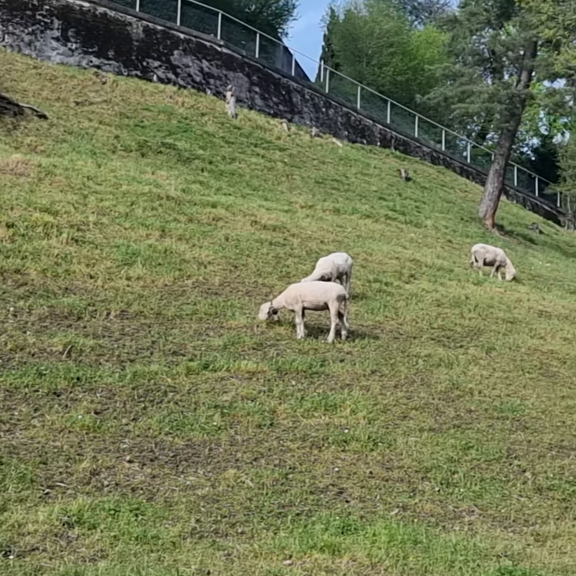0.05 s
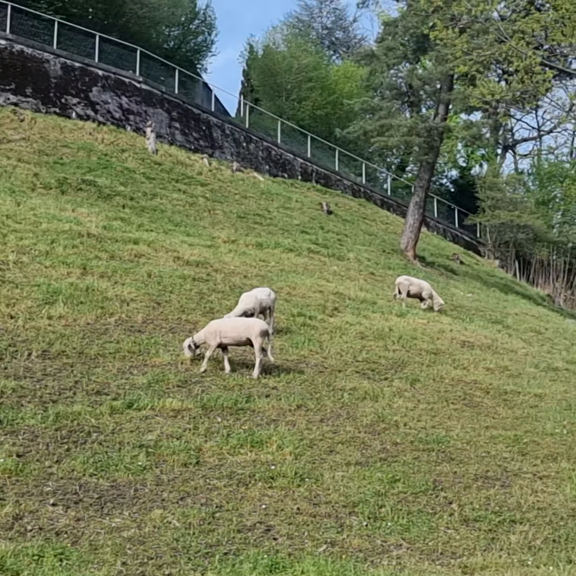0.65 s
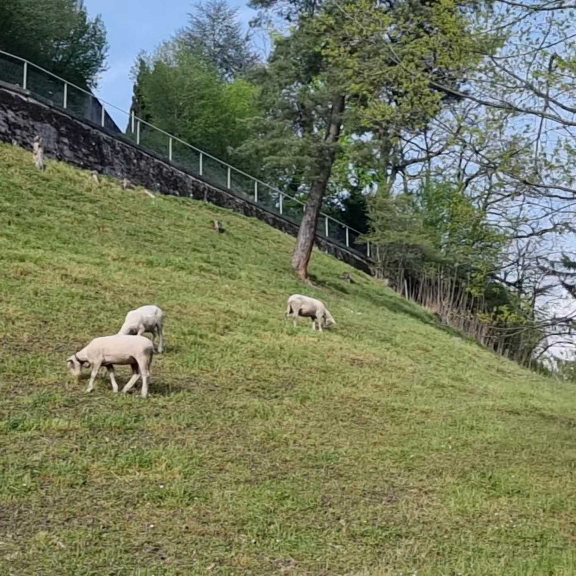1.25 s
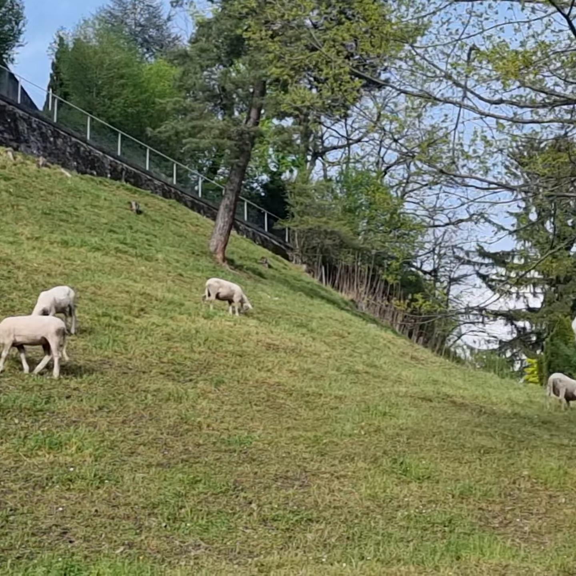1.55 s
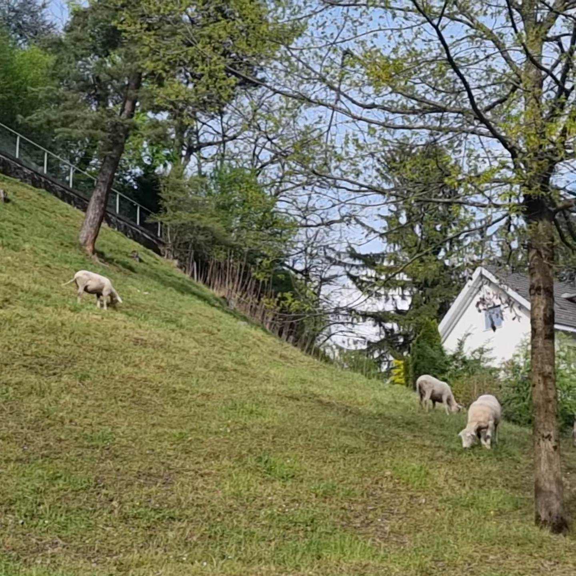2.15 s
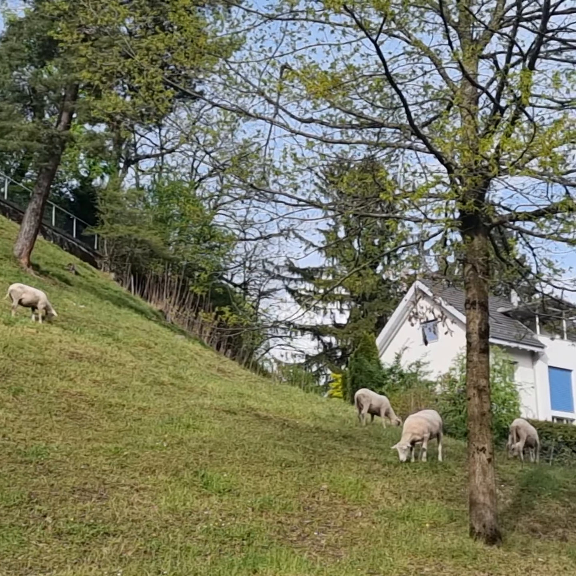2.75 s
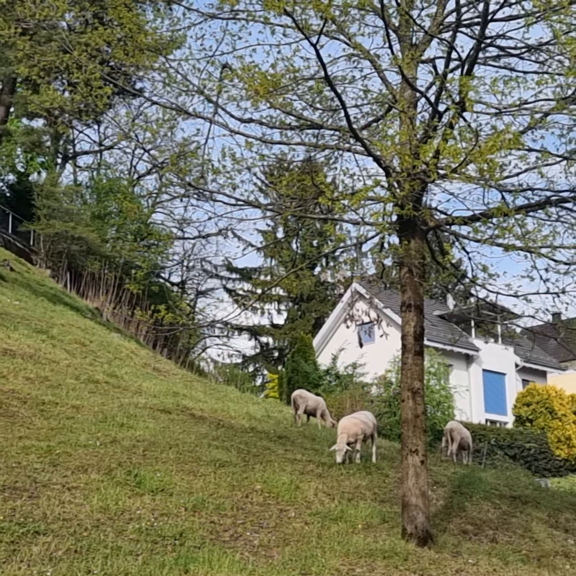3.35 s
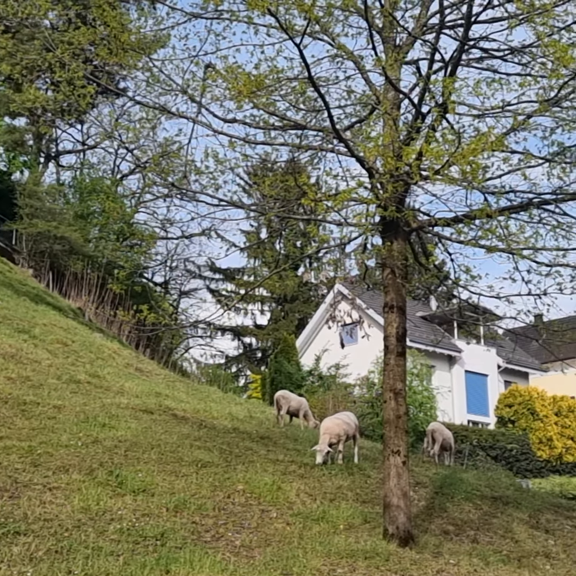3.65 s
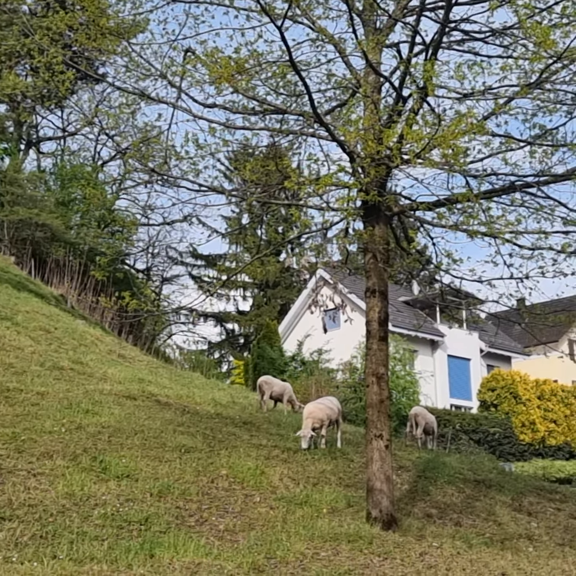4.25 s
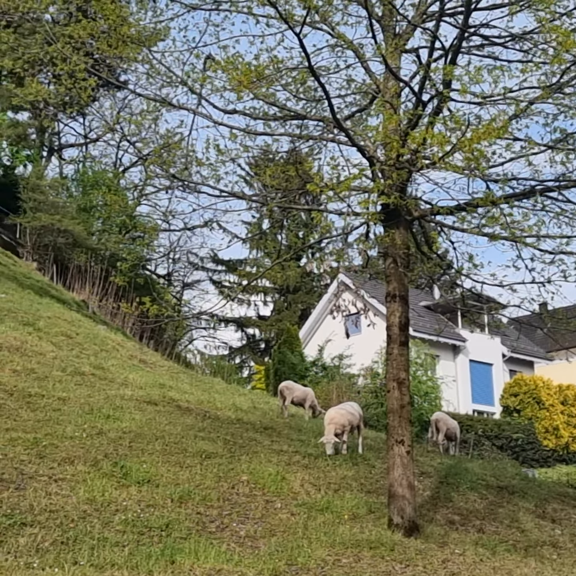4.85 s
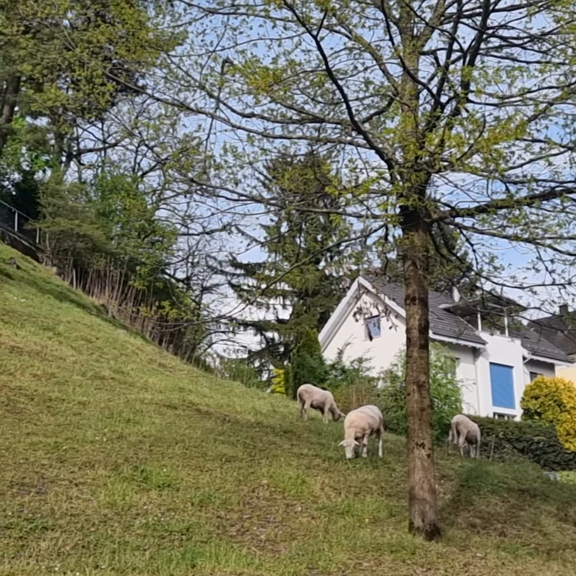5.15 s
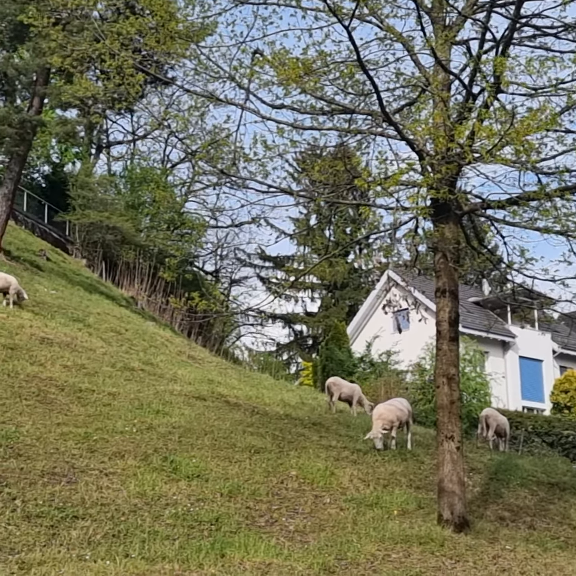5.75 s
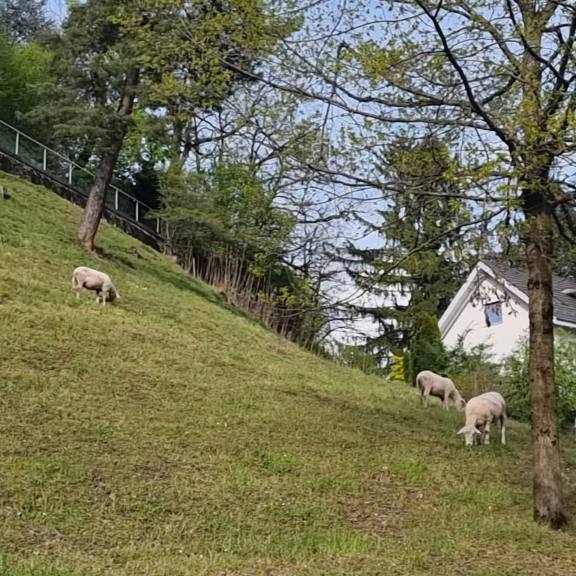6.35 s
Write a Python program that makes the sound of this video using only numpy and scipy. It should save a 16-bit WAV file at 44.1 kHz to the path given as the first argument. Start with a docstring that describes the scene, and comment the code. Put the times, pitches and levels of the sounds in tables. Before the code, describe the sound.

Wind buffets the microphone with low thumps while a small metal bell on a sheep knocks irregularly nearby, each hit bright and briefly ringing. The wind eases midway, leaving the bell and a bird's faint gliding whistles from the trees, then gusts come back near the end. An engine hums very quietly far away. The sound has a slight outdoor echo and sits in the left channel only.

```python
"""Sheep bell on a windy hillside

Close by on a grassy slope, the clapper of a small collar bell knocks and bounces as a sheep tugs at
the grass. A bird whistles slow glides from the trees, an engine hums far off, and gusts buffet the
microphone. Hillside, wall and houses return a faint echo. The scene is on the left channel alone."""
import sys
import numpy as np
from scipy import signal
from scipy.fft import rfft, irfft, next_fast_len
from scipy.io import wavfile
from scipy.ndimage import uniform_filter1d

SR = 44100
rng = np.random.default_rng(int(sys.argv[2]) if len(sys.argv) > 2 else 0)


def int16_out(signal):
    """Quantize to a 16-bit WAV file."""
    q = np.round(np.clip(np.atleast_2d(signal).T, -1, 1) * 32767)
    wavfile.write(sys.argv[1], SR, q.astype(np.int16))


N = 286209
TIME = np.arange(N) / SR


def bell(ring_db=-1):
    """A small collar bell, close by: its loose clapper sets the wall ringing and clashes against it."""
    hits = clapper_contacts()
    return undb(ring_db) * bell_ring(hits) + bell_clash(hits)


def clapper_blows(node_depth=0.96):
    """A blow drives modes fully at an antinode, barely at a node; rows of start_s, level_db per family."""
    # clapper blows on the rim: start_s, strength_db, brightness_db, place_deg
    blows = [(0.3409, -28.5, -6.0, 88.4), (0.668, -30, -1.5, 152), (0.97, -43.0, 1.5, 172),
             (0.9954, -34, -10.5, 172), (1.1873, -39.5, 5, 50.3), (1.2059, -32, -0.5, 26.4),
             (1.324, -26, -0.5, 174), (1.5045, -27.5, -0.5, 82), (1.523, -22.5, -1, 86),
             (1.592, -43, 2.5, 84), (1.7038, -42, -3, 140), (1.8442, -37.5, -0.5, 66),
             (1.925, -35.5, -14.0, 173), (2.204, -45.5, -11, 164), (2.2996, -31, -13.5, 88),
             (2.35, -36, -4, 168), (2.587, -41.5, 1.5, 126), (2.609, -33.5, -1, 56.5),
             (2.7446, -36, -8.0, 28), (2.867, -34, -5, 165), (2.8859, -30.5, -1.5, 1.2),
             (3.212, -42.0, 6, 15.4), (3.228, -48.5, 8.0, 60), (3.243, -45, -5, 172),
             (3.4208, -33.5, -2, 148), (3.5092, -33, 5, 15), (3.7164, -41, -14.5, 7.8),
             (3.8036, -39, 1, 106), (4.045, -48.5, 4, 31.6), (4.0907, -45.5, -7.5, 130),
             (4.321, -45.5, -14.5, 144), (4.3883, -36, -2.0, 16.6), (4.409, -33, -6.0, 30.8),
             (4.596, -48.5, -0.5, 57), (4.6446, -40, -20.5, 92), (4.8458, -47.5, -19.5, 72),
             (4.8692, -41.5, -21, 48), (4.916, -45.5, -18.5, 80), (5.123, -43, -6.0, 94),
             (5.1676, -29, -19.5, 93.7), (5.4763, -52, -15, 90), (5.513, -36.5, -18, 100),
             (5.8409, -39, -5.5, 37), (5.8709, -25.5, -18, 92), (6.138, -39.5, -11.5, 96),
             (6.4515, -51, -1, 49.4), (6.483, -35.5, -9, 100)]
    # mode families (body, chime, lower clang, upper clang, ping, shimmer with no common nodes):
    # nodal_diameters, antinode_deg, brightness_share
    families = [(2, 33, 0), (3, 13, .3), (4, 18, .3), (5, 27, .4), (6, 9, .7), (0, 0, 1)]
    # how readily each family answers the clapper: level_db
    response_db = [1, -0.5, 2, 1, 5, -0.5]
    start_s, strength_db, brightness_db, place_deg = np.transpose(blows)[:, :, None]
    diameters, antinode_deg, share = np.transpose(families)
    coupling = 1 - node_depth * np.sin(diameters * np.radians(place_deg - antinode_deg)) ** 2
    drive_db = strength_db + np.array(response_db) + share * brightness_db + 10 * np.log10(coupling)
    return np.hstack([start_s, drive_db])


def clapper_contacts(rebounds=4, rebound_db=-12, gap_s=0.03, rebound_t60=0.26):
    """The clapper bounces lightly after each blow; gives blows and rebounds in time order."""
    blows = clapper_blows()
    soft_loss_db = 7 * np.array([0.82, 1.2, 1.5, 0.54, 1.35, 0.9])  # per family, for a light touch
    rows, lag_s = [blows], 0
    for _ in range(rebounds):
        lag_s = lag_s + gap_s * rng.uniform(0.3, 1.7, len(blows))
        decay_db = 20 * np.log10(fade(lag_s, rebound_t60))[:, None]
        drive_db = blows[:, 1:] + rebound_db - soft_loss_db + decay_db
        rows.append(np.column_stack([blows[:, 0] + lag_s, drive_db]))
    rows = np.vstack(rows)
    return rows[np.argsort(rows[:, 0])]


def bell_ring(hits, scatter_db=1, treble_scatter_db=3, split_hz=11, twin_db=-10, grip=0.81, swing_db=2.5):
    """The modes carry their motion from one contact to the next, and waver as the bell swings."""
    # modes of the bell; those of one family answer a blow together: pitch_hz, level_db, t60_s, family
    modes = [(1084, -14, 1.1, 0), (1507, -19.5, 0.9, 0), (1934, -12, 0.75, 0), (2284, -10.5, 0.72, 0),
             (3012, -7.5, 0.66, 1), (3558, -5, 0.46, 2), (4032, -5, 0.52, 0), (4589, -3.5, 0.39, 3),
             (5436, -4.5, 0.47, 1), (6137, -16, 0.4, 4), (6336, -15, 0.35, 4), (6465, -9, 0.36, 4),
             (6590, -17, 0.3, 4), (7224, 0, 0.27, 4), (7811, -9, 0.33, 4), (8506, -14, 0.36, 4),
             (9292, -12, 0.3, 4), (9485, -17, 0.32, 4), (10734, -22, 0.28, 5), (11154, -16, 0.28, 5),
             (11676, -13, 0.24, 5), (11768, -13, 0.26, 5), (12021, -13, 0.25, 5), (12349, -13, 0.23, 5),
             (12511, -13, 0.25, 5), (13167, -12, 0.24, 5), (13491, -11, 0.24, 5), (14099, -14, 0.23, 5),
             (14293, -14, 0.23, 5), (14546, -19, 0.23, 5)]
    hz, mode_db, t60, family = np.transpose(modes * 2)
    family = family.astype(int)
    # the bell is not quite round: each mode has a weaker twin that beats against it
    twin = np.arange(len(hz)) >= len(modes)
    hz = hz + twin * split_hz * hz / np.median(hz) * rng.choice([-0.9, -1, 1, 3.5], len(hz))
    t = TIME[:SR]
    rings = np.exp(2j * np.pi * hz[:, None] * t) * fade(t, t60[:, None])
    members = np.unique(family)[:, None] == family
    tracks, motion = np.zeros((len(members), N)), np.zeros(len(hz), complex)
    starts = np.minimum(hits[:, 0] * SR, N).astype(int)
    for drive_db, start, end in zip(hits[:, 1:], starts, np.append(starts[1:], N)):
        chance_db = (scatter_db + treble_scatter_db * hz / hz.max()) * rng.standard_normal(len(hz))
        push = undb(drive_db[family] + mode_db + twin * twin_db + chance_db)
        # a firm contact damps the old ring and adds its own energy, a quarter turn out of step
        motion = motion * (1 - grip * push / (push + abs(motion)))
        motion = motion + push * 1j * rng.choice([-1, 1], len(hz)) * np.exp(1j * np.angle(motion))
        n = min(end - start, SR - 1)
        tracks[:, start:start + n] = ((members * motion) @ rings[:, :n]).real
        motion = motion * rings[:, n]
    return sum(track * undb(swing_db * walk(45)) for track in tracks)


def bell_clash(hits, shimmer_hz=10000, shimmer_db=1, grit_db=5):
    """Each contact gives a tick, a brief clash and a gritty sizzle of countless weak modes."""
    # spectrum of metal striking metal: frequency_hz, level_db
    clash_colour = [(500, -30), (750, 1), (930, 12.5), (1300, -1), (1750, -5.5), (2800, 8.5), (3700, -8),
                    (4800, 8), (5700, 4.5), (6800, 13.5), (8500, -3), (10300, 3.5), (12000, -5),
                    (15200, -3)]
    stages = [(2, 0.024), (-4, 0.093), (-12, 0.31)]  # tick, clash, sizzle: level_db, t60_s
    t = TIME[:SR // 2]
    power = sum((undb(db) * fade(t, t60)) ** 2 for db, t60 in stages)
    dull_power, bright_power = np.zeros(N), np.zeros(N)
    for start_s, *drive_db in hits:
        add(dull_power, start_s, power * undb(drive_db[:-1]).mean() ** 2)
        add(bright_power, start_s, power * undb(drive_db[-1] + shimmer_db) ** 2)
    clash = noise(clash_colour)
    dull = signal.sosfiltfilt(signal.butter(2, shimmer_hz, fs=SR, output="sos"), clash)
    # the thin wall gathers the treble into narrow metallic peaks
    wall = rng.standard_normal(len(t)) * fade(t, t60=0.025)
    bright = signal.fftconvolve(clash - dull, wall / np.linalg.norm(wall))[:N]
    grit = undb(2 + grit_db * walk(360))
    return np.sqrt(dull_power) * dull + np.sqrt(bright_power) * bright * grit


def wind(rumble_db=-3, flutter_db=-1.5, tearing_db=-1, lull_db=5, thump_s=0.024, slap_s=0.0066):
    """Gusts rumble and eddies thump on the microphone; stronger wind flutters and tears more."""
    # wind at the microphone: time_s, strength_db
    gusts = [(0, -16.5), (.52, -17.5), (.63, -27), (1.05, -29), (1.33, -34), (1.44, -21), (1.8, -17),
             (2.13, -26.5), (2.23, -40.5), (2.62, -35.5), (3.05, -51), (4.36, -48.5), (4.5, -27),
             (4.75, -35.5), (5.12, -52), (5.42, -33), (5.65, -38.5), (5.86, -24.5), (6.02, -40),
             (6.49, -37)]
    # the largest eddies, each a thump: time_s, rumble_db, flutter_db
    thumps = [(.005, -12, -23), (0.114, -11.5, -13), (.185, -12, -14), (.25, -14.5, -17), (.38, -16.5, -18),
              (.45, -11.5, -19.5), (.495, -22, -20.5), (0.551, -12, -25), (.71, -22, -38),
              (.79, -23.5, -43), (.925, -22.5, -45), (1.413, -19.5, -32), (1.5, -25.5, -30),
              (1.615, -23.5, -24.5), (1.675, -21.5, -24.5), (1.805, -10.5, -17), (1.962, -16.5, -22),
              (2.11, -17.5, -29.5), (2.166, -19.5, -38), (2.28, -29, -51), (2.651, -35, -50),
              (3.78, -38, -74), (4.273, -34.5, -47), (4.54, -23, -46), (4.637, -18.5, -41),
              (5.275, -15.5, -32), (5.486, -21, -51), (5.7, -28.5, -37), (5.785, -26.5, -31.5),
              (5.87, -18.5, -48), (6.23, -30, -70), (6.388, -18.5, -25.5), (6.45, -23, -41)]
    # the sharpest eddies, each a slap: time_s, level_db
    slaps = [(0.105, -18.5), (0.12, -17), (0.167, -17.5), (0.223, -17.5), (1.806, -33)]
    # spectra of slow eddies, quick eddies and the tearing of strong gusts: frequency_hz, level_db
    rumble_colour = [(12, -30.5), (25, -10.5), (45, -2.5), (70, 3), (100, -4), (140, -20.5), (260, -39),
                     (500, -85)]
    flutter_colour = [(70, -14), (120, 4.5), (190, -2), (260, -14.5), (400, -35.5), (800, -69),
                      (2000, -85.5)]
    tearing_colour = [(120, -16.5), (220, 5), (310, 4), (450, -11.5), (700, -24.5), (1200, -39),
                      (2500, -57.5), (8000, -104)]
    knee_db, growth = -13.5, 1.422  # flutter grows faster than rumble; their envelopes meet at the knee
    strength_db = np.interp(TIME, *np.transpose(gusts)) - lull_db * abs(walk(28))
    rumble = undb(strength_db)
    flutter = undb(knee_db + growth * (strength_db - knee_db))
    for time_s, low_db, high_db in thumps:
        near = abs(TIME - time_s) < 10 * thump_s
        shape = pulse(TIME[near], time_s, thump_s)
        rumble[near] += shape * (undb(low_db) - rumble[near])
        flutter[near] += shape * (undb(high_db) - flutter[near])
    tearing = undb(tearing_db) * flutter ** 1.5
    tearing += sum(undb(db) * pulse(TIME, time_s, slap_s) for time_s, db in slaps)
    ragged = steady(noise(tearing_colour) * undb(3 * walk(130)), span_s=0.047)
    slow_eddies = undb(rumble_db) * rumble * steady(noise(rumble_colour), span_s=0.071)
    quick_eddies = undb(flutter_db) * flutter * steady(noise(flutter_colour), span_s=0.072)
    return slow_eddies + quick_eddies + tearing * ragged


def bird_whistles(waver=0.011, flicker_db=3, edge_s=0.0044, edge_db=-4):
    """A bird in the trees whistles nearly pure tones that arc in pitch, swell and waver."""
    # one arc of pitch per whistle: start_s, length_s, first_hz, middle_hz, last_hz, level_db
    whistles = [(0.079, 0.22, 2856, 2777, 3300, -58.5), (0.498, 0.057, 2880, 2780, 2660, -52.5),
                (0.675, 0.21, 2460, 2520, 1850, -56), (1.035, 0.3, 1950, 2560, 2130, -54.5),
                (3.66, .22, 2556, 2180, 1820, -49), (3.953, 0.27, 2227, 2440, 2488, -48),
                (4.257, .13, 3040, 3370, 3060, -45), (4.462, .2, 1410, 1704, 2095, -51.5),
                (4.791, .06, 7100, 6420, 5680, -66), (5.074, 0.065, 3040, 3240, 3440, -60),
                (5.213, 0.11, 2430, 2570, 2620, -55.5), (5.695, .13, 4100, 3716, 3665, -62),
                (6.15, 0.097, 2815, 2207, 1984, -58)]
    out = np.zeros(N)
    wobble, flicker = 1 + waver * walk(160), undb(flicker_db * walk(70))
    for start_s, length_s, first_hz, middle_hz, last_hz, db in whistles:
        on = (TIME > start_s) & (TIME < start_s + length_s)
        along = (TIME[on] - start_s) / length_s
        hz = np.polyval(np.polyfit([0, 0.5, 1], [first_hz, middle_hz, last_hz], 2), along)
        gate = np.clip(np.minimum(along, 1 - along) * length_s / edge_s, 0, 1)
        swell = undb(db + edge_db * (2 * along - 1) ** 2)
        out[on] += np.sqrt(2) * gate * swell * flicker[on] * np.sin(running_phase(hz * wobble[on]))
    return out


def bird_rasp(time_s=6.34, half_length_s=0.016, hz=3300, width_hz=1300, level_db=-51):
    """The bird gives one short, hoarse burst of noise."""
    hoarse = noise([(hz - width_hz, -25), (hz - width_hz / 2, -3), (hz, 0),
                    (hz + width_hz / 2, -3), (hz + width_hz, -18), (4 * hz, -30)])
    return undb(level_db) * hoarse * pulse(TIME, time_s, half_length_s)


def far_engine(firing_hz=64.24, drift=0.005, throb_db=1.46):
    """An engine far off hums at multiples of its firing rate, each throbbing on its own."""
    # partials of the hum: harmonic_number, level_db
    harmonics = [(1, -54.5), (2, -61), (3, -59.5), (6, -72)]
    phase = running_phase(firing_hz * (1 + drift * walk(4)))
    hum = np.zeros(N)
    for number, db in harmonics:
        amplitude = np.sqrt(2) * undb(db + throb_db * walk(5.1))
        hum += amplitude * np.sin(number * phase + 2 * np.pi * rng.random())
    return hum


def valley_air(level_db=-57, swell_db=1):
    """Open air and far traffic blend into a soft, gently swelling rush."""
    # spectrum of the rush: frequency_hz, level_db
    air_colour = [(25, -17), (70, -1), (170, -5), (330, -9.5), (520, -18), (800, -13), (1050, -11),
                  (1500, -20), (2300, -23.5), (4000, -35), (8000, -45), (15000, -54)]
    return undb(level_db + swell_db * walk(3.32)) * noise(air_colour)


def far_drone(pitches_hz=(315, 355, 395, 455), level_db=-79, swell_db=5, wander=0.014):
    """Faint wandering tones in the far rush swell and sink on their own."""
    phases = (running_phase(hz * (1 + wander * walk(40))) for hz in pitches_hz)
    return sum(undb(level_db + swell_db * walk(5.2)) * np.sin(phase) for phase in phases)


def hillside_echo(x, t60, build_s, dull_hz):
    """Diffuse echo from slope, trees and walls; it builds up gradually and has less treble."""
    t = TIME[:SR]
    tail = rng.standard_normal(SR) * fade(t, t60) * (1 - np.exp(-(t / build_s) ** 2))
    tail /= np.linalg.norm(tail)
    tail = signal.sosfilt(signal.butter(1, dull_hz, fs=SR, output="sos"), tail)
    return signal.fftconvolve(x, tail)[:N]


def idle_channel(level_db=-69.5):
    """The unused right channel carries only its own faint noise."""
    # spectrum of the self-noise: frequency_hz, level_db
    idle_colour = [(30, 0), (100, -4.5), (300, -6), (1000, -17), (3000, -28), (10000, -46), (15000, -36)]
    return undb(level_db) * noise(idle_colour)


def undb(db):
    """Decibels to gain."""
    return 10 ** (np.asarray(db) / 20)


def noise(colour):
    """Noise of rms 1, shaped by points of frequency_hz, level_db."""
    hz, db = np.transpose(colour)
    size = next_fast_len(N)
    bins_hz = np.maximum(np.arange(size // 2 + 1) * SR / size, 1)
    gain = undb(np.interp(np.log(bins_hz), np.log(hz), db))
    x = irfft(rfft(rng.standard_normal(size)) * gain, size)[:N]
    return x / x.std()


def walk(rate_hz):
    """Smooth random wander of spread 1, heading for a new value rate_hz times a second."""
    hold = int(SR / rate_hz)
    steps = np.repeat(rng.standard_normal(N // hold + 1), hold)
    x = uniform_filter1d(uniform_filter1d(steps, hold), hold)[:N]
    return x / x.std()


def steady(x, span_s):
    """Evens out the swells of a noise that are slower than span_s."""
    span = int(span_s * SR)
    return x / np.sqrt(uniform_filter1d(uniform_filter1d(x ** 2, span), span) + 1e-9)


def fade(t, t60):
    """Free decay, 60 dB down after t60 seconds."""
    return np.exp(-np.log(1000) * t / t60)


def pulse(t, centre_s, half_length_s):
    """A smooth rise and fall, peaking at 1."""
    return np.exp(-((t - centre_s) / half_length_s) ** 2)


def running_phase(hz):
    """Phase in radians of a changing pitch."""
    return 2 * np.pi * np.cumsum(hz) / SR


def add(track, start_s, sound):
    """Mixes a sound into the track from a given time."""
    i = int(np.clip(start_s * SR, 0, N - 1))
    track[i:i + len(sound)] += sound[:N - i]


def scene():
    """One microphone, on the left channel: the bell near and fairly dry, the bird far and echoing."""
    clank, song = bell(), bird_whistles() + bird_rasp()
    near = clank + undb(-9) * hillside_echo(clank, t60=0.57, build_s=0.0063, dull_hz=4900)
    far = undb(-5.5) * song + undb(-4.5) * hillside_echo(song, t60=1.1, build_s=0.035, dull_hz=7000)
    left = undb(5) * (near + far + wind() + far_engine() + valley_air() + far_drone())
    return np.array([left, idle_channel()])


def record(dry):
    """The microphone rounds peaks near full scale and cuts the top."""
    cutoff_hz = 15800
    rounded = dry / (1 + dry ** 6) ** (1 / 6)
    return signal.sosfilt(signal.ellip(10, 0.2, 80, cutoff_hz, fs=SR, output="sos"), rounded)


dry = scene()
out = record(dry)
int16_out(out)
```